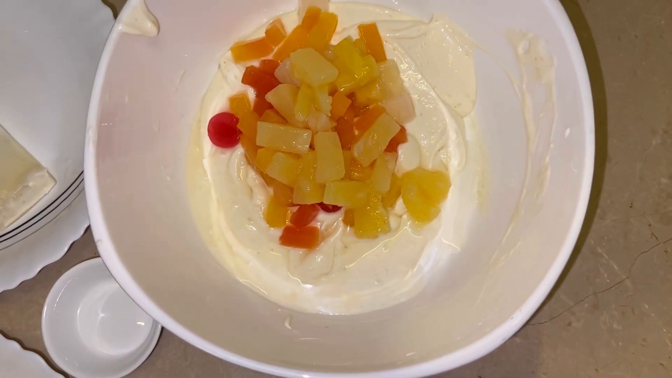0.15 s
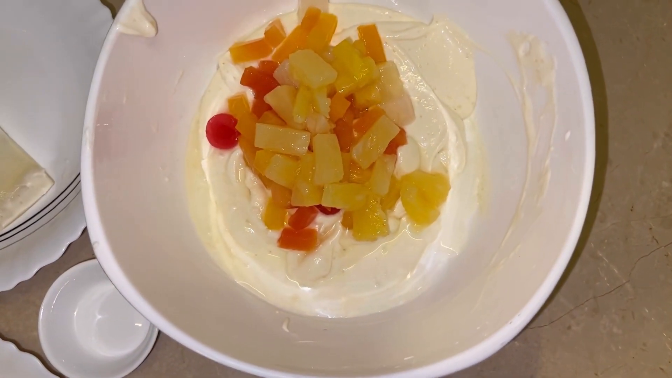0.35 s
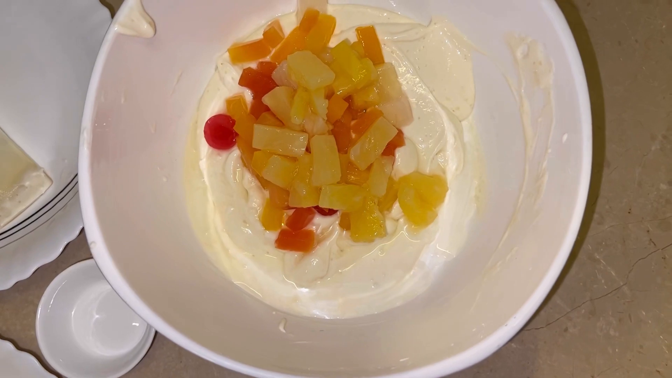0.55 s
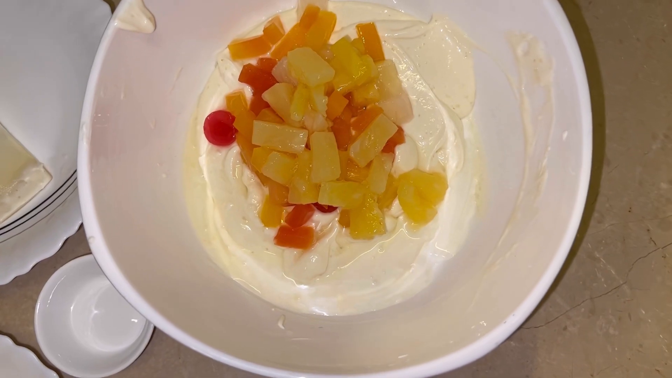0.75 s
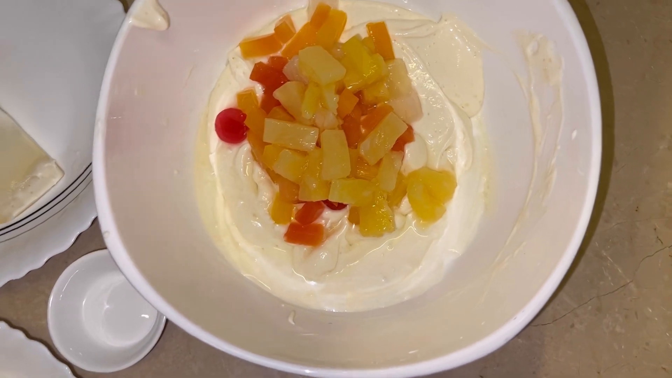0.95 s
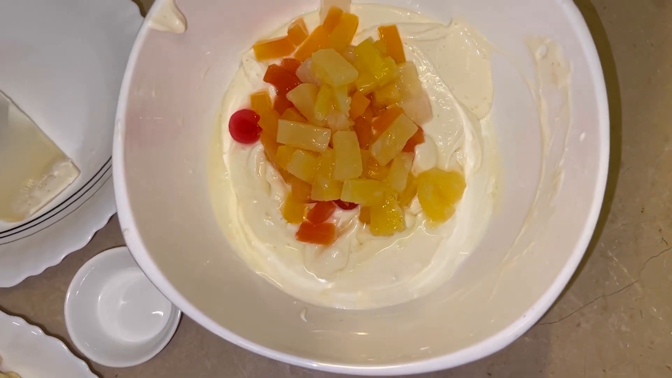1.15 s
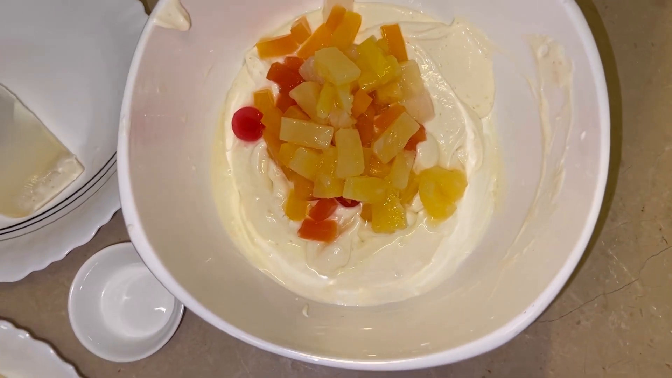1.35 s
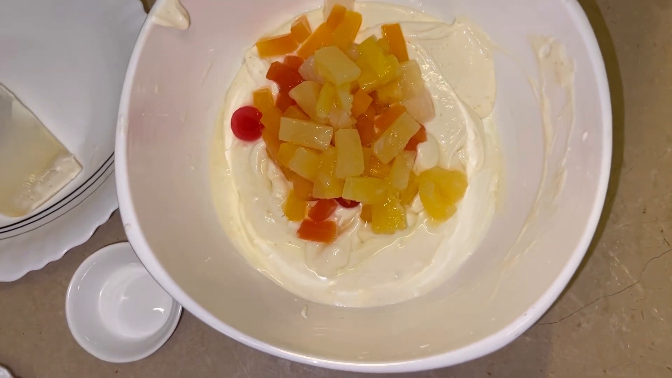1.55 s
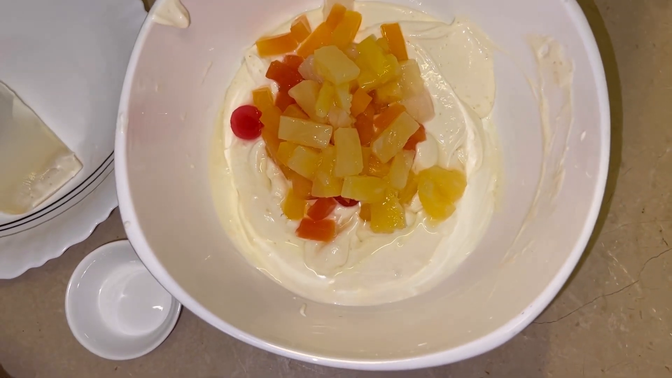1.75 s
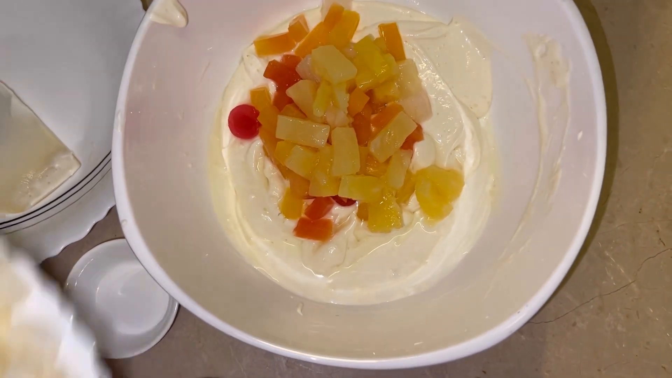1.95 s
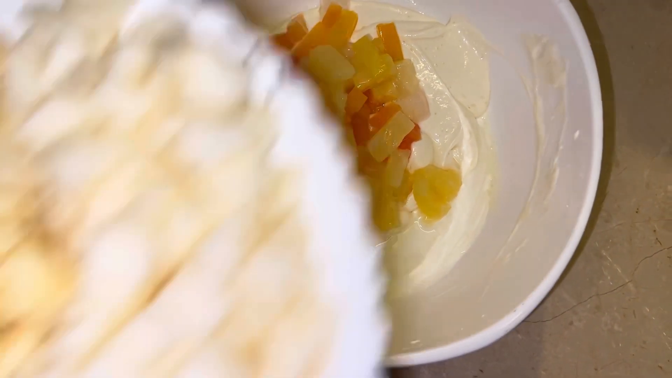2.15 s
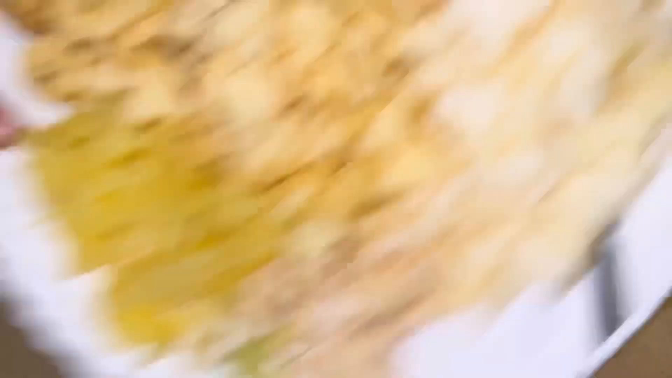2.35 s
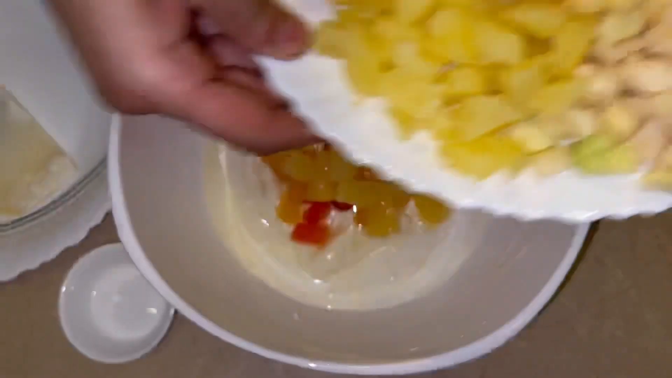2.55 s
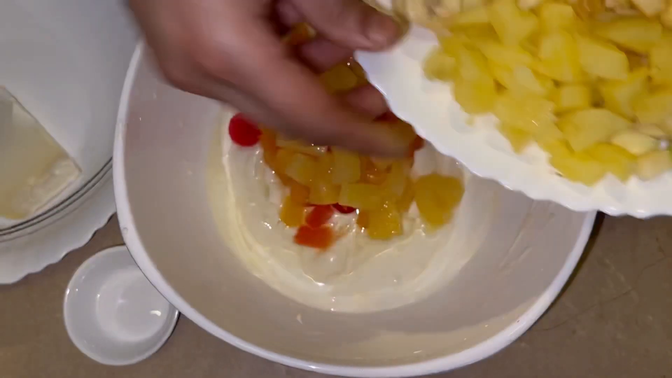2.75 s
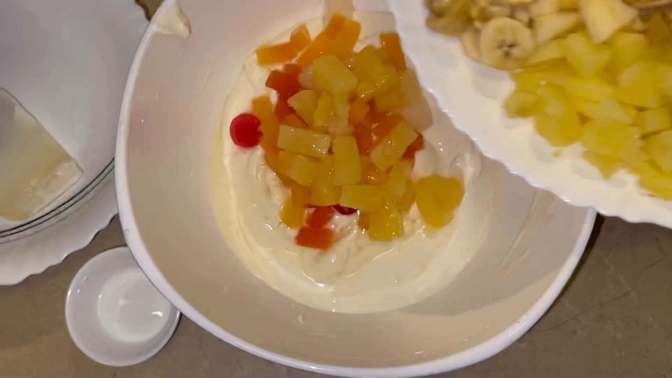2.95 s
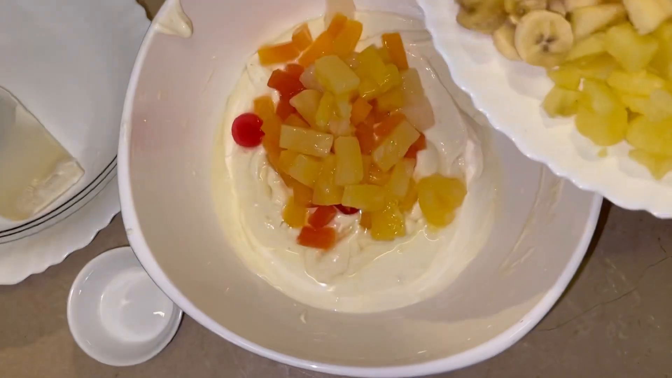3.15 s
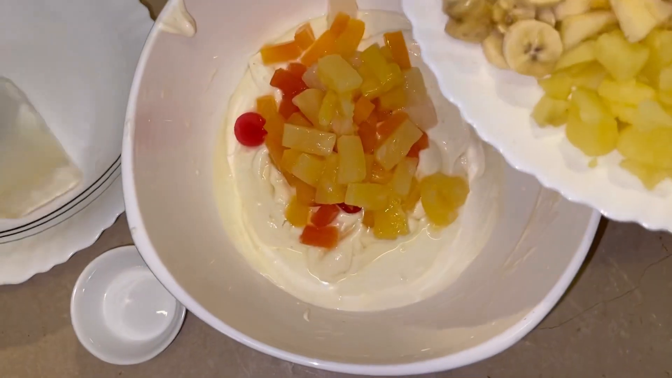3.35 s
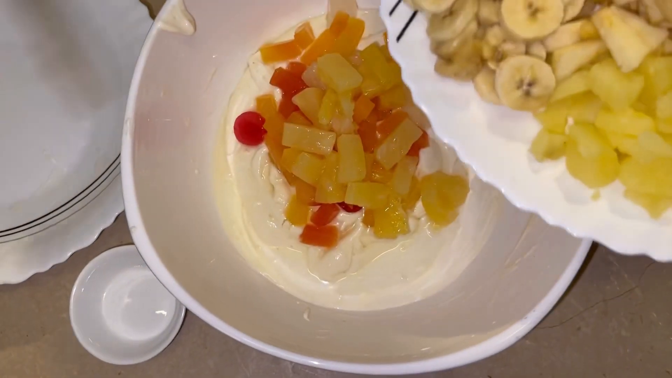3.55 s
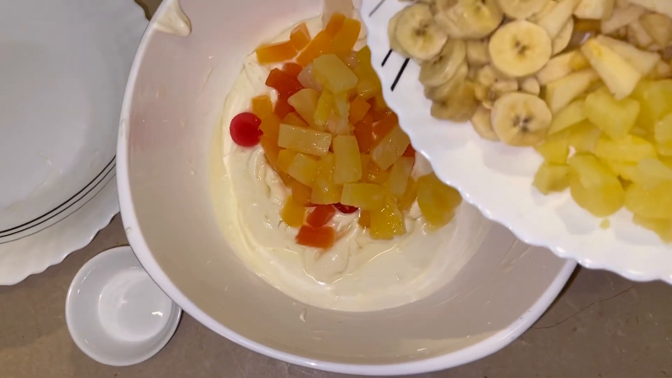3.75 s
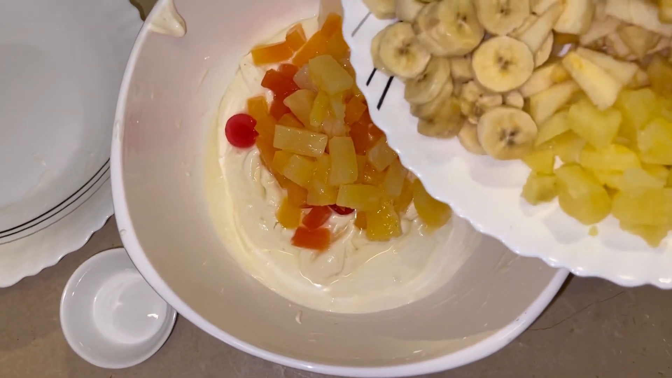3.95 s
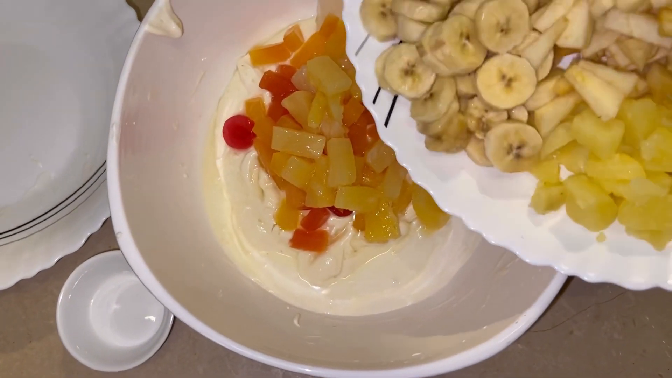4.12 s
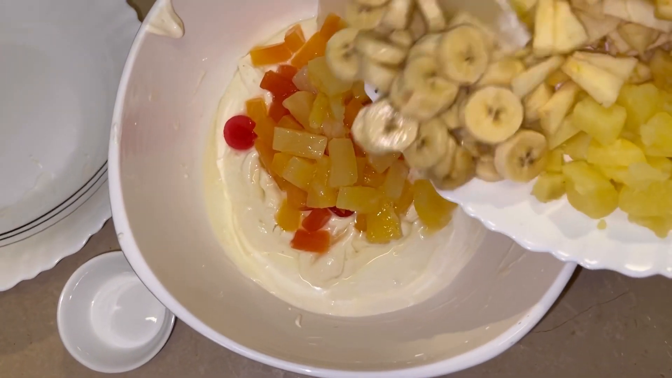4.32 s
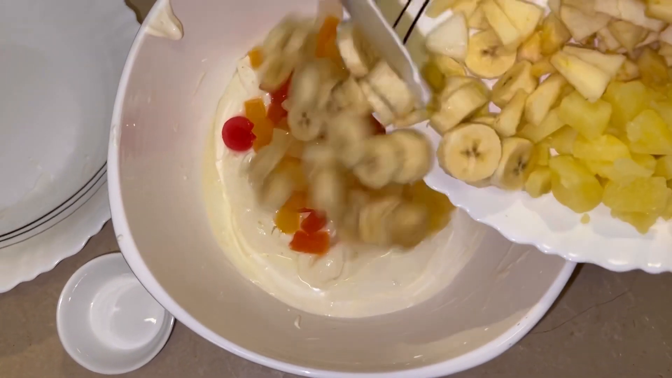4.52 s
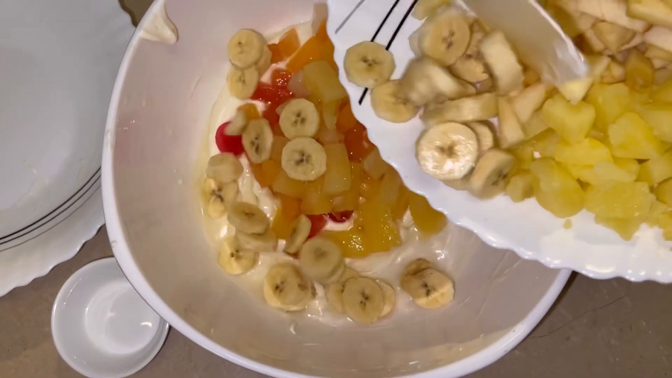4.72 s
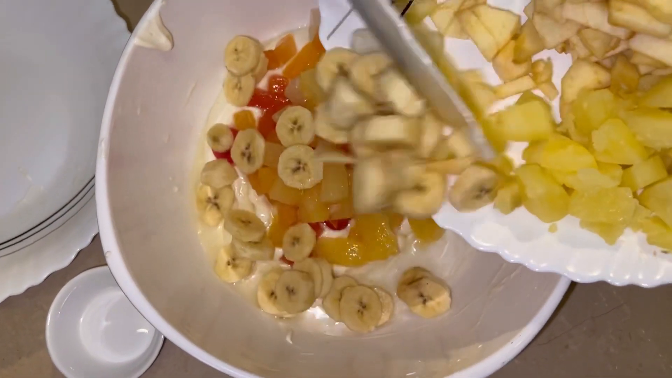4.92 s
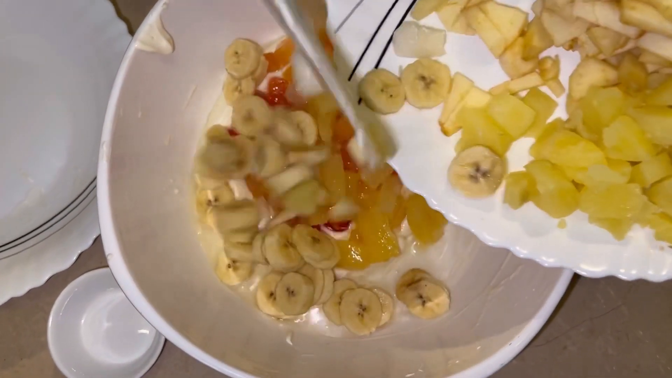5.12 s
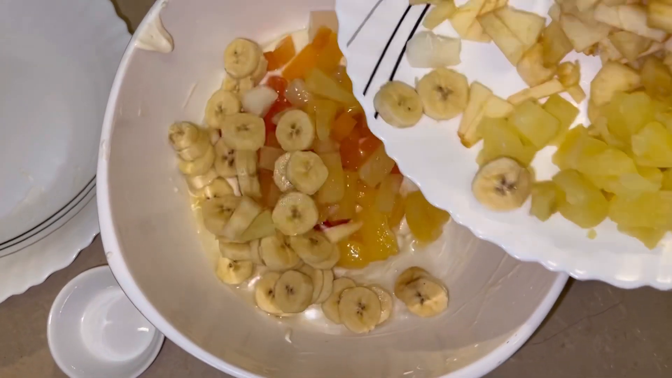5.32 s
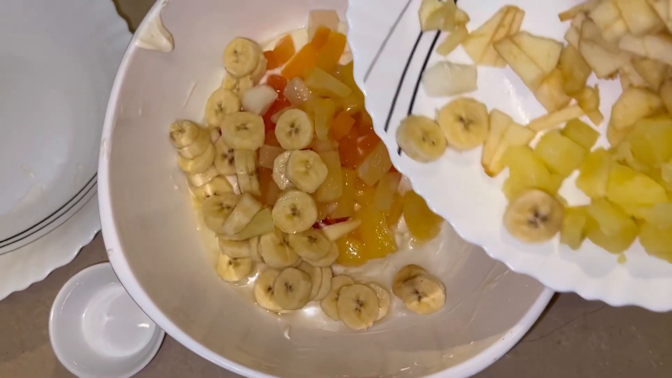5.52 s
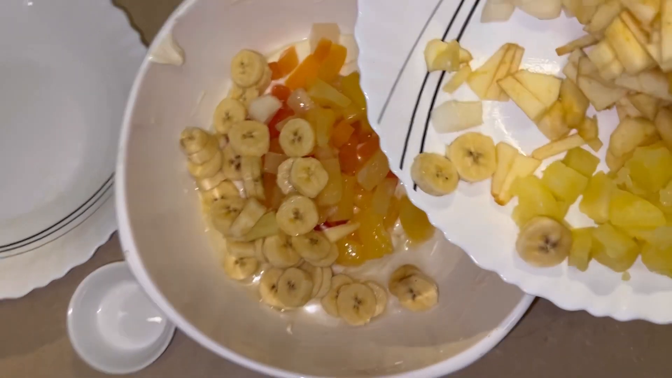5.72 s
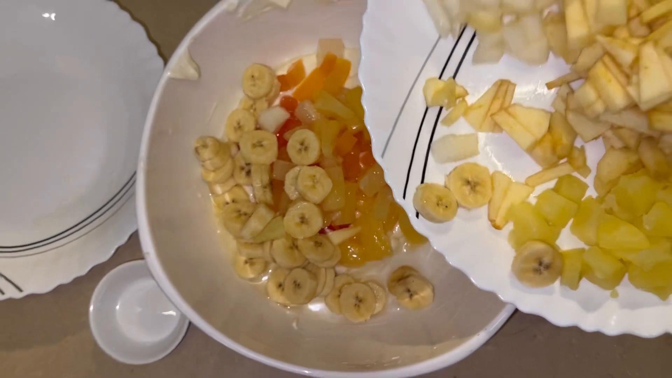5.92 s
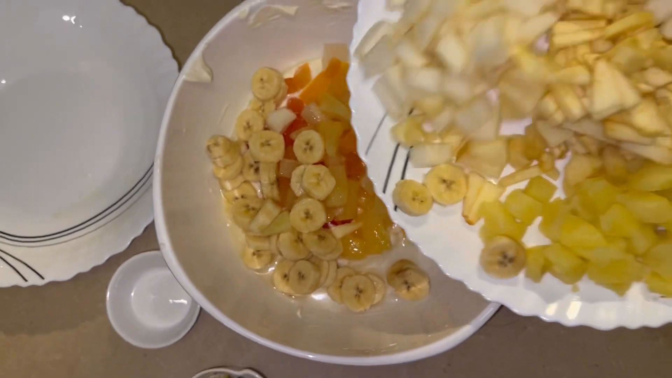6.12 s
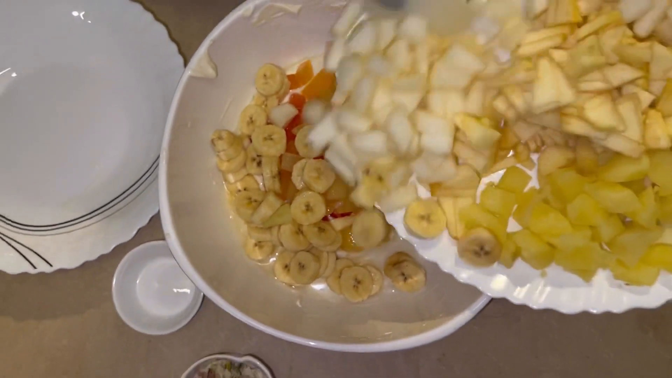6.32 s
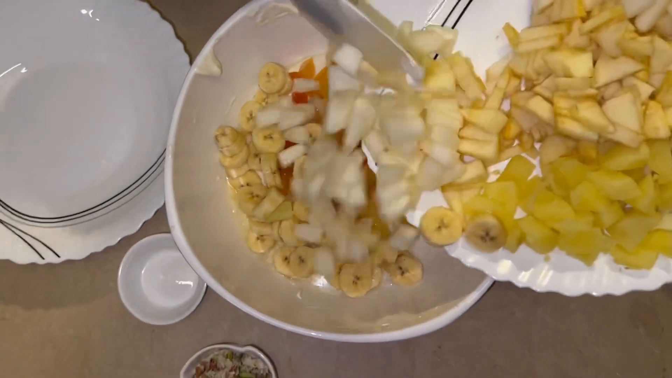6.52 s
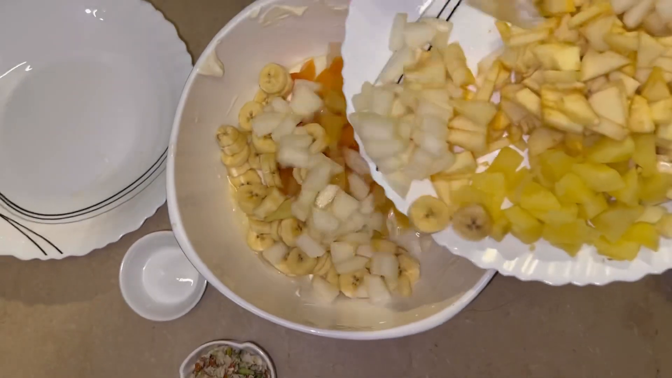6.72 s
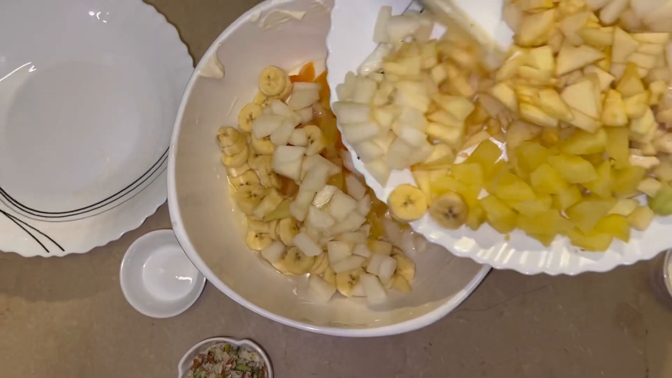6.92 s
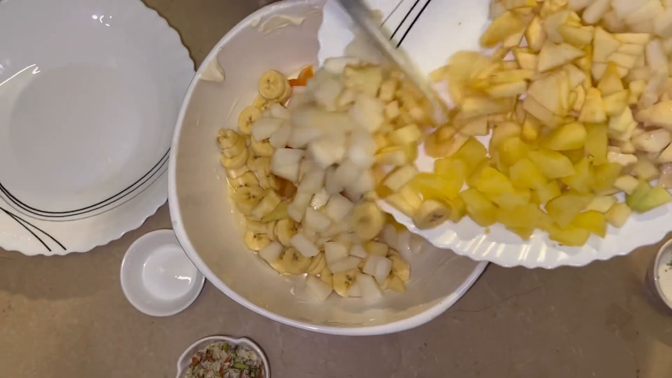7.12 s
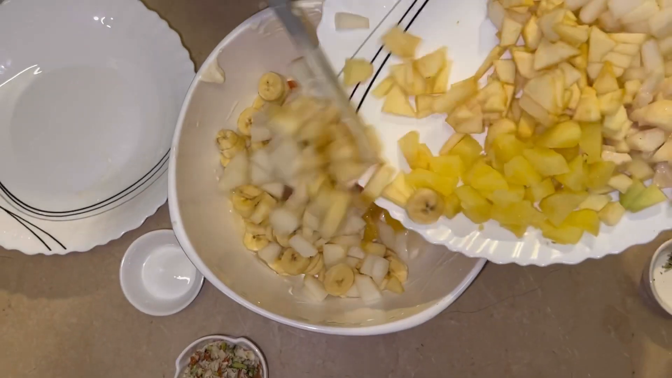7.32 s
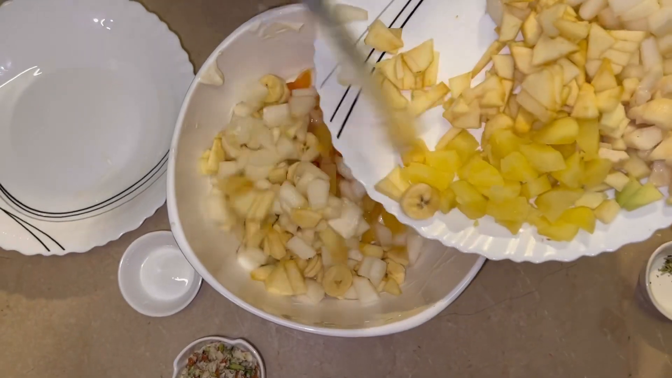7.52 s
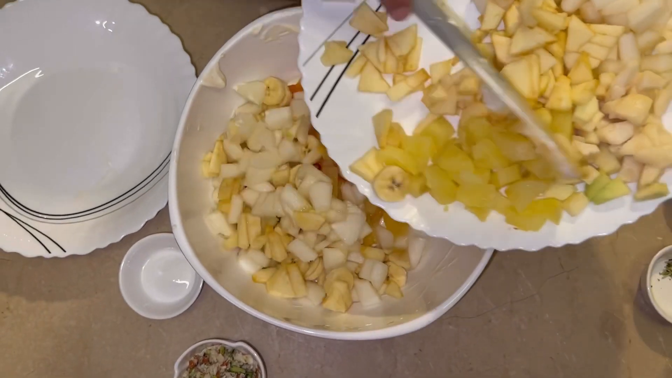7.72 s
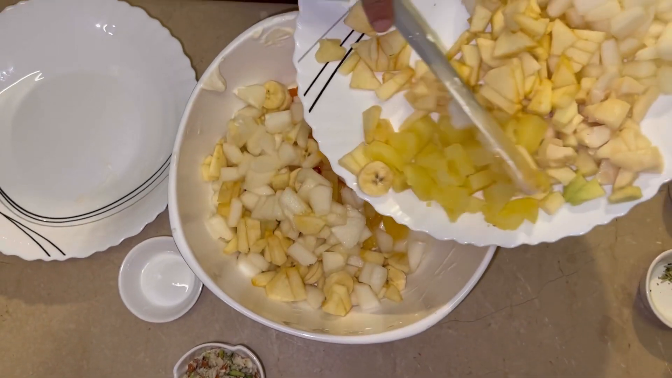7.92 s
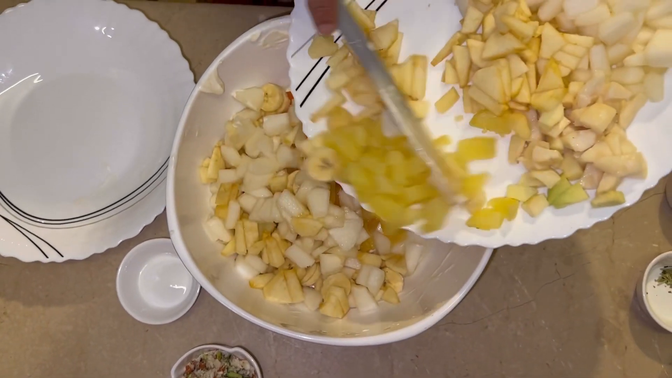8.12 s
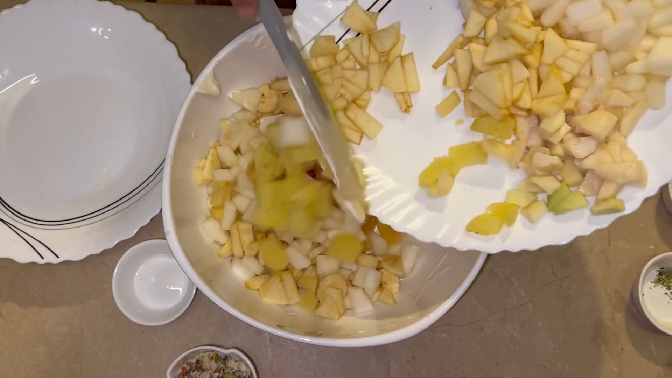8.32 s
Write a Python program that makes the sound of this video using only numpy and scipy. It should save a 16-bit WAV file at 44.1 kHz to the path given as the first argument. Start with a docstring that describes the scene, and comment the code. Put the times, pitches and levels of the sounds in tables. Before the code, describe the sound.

Close above a plastic bowl in a small kitchen, two china clinks sound a little way off, then a few dull knocks as a loaded plate is lifted. The plate strikes the bowl rim with a very loud, overloaded crack and quick bounces. A moderate knock follows near five seconds and a sharper double one after six, among barely audible wet fruit squelches, over a soft steady rush and low rumble.

```python
"""Chopped fruit tipped from a china plate

Dishes clink on a kitchen counter, then a loaded plate knocks dully as it is gripped and lifted.
It lands hard on a plastic bowl's rim, bounces and knocks again; a knife sweeps wet fruit into the bowl.
Blows are short pulses with noise bodies and decaying sine modes; squelches are filtered crackles.
The small room adds a brief diffuse tail; coloured noise makes a steady rush and a low rumble."""
import sys
import numpy as np
from scipy import signal
from scipy.fft import rfft, irfft
from scipy.io import wavfile

SR = 44100
rng = np.random.default_rng(int(sys.argv[2]) if len(sys.argv) > 2 else 0)


def unload_wav(signal):
    """Save mono or channel-first audio to the path in sys.argv[1] as 16-bit WAV at rate SR, clipped to [-1, 1]."""
    wavfile.write(
        sys.argv[1],
        SR,
        np.round(np.clip(np.atleast_2d(signal).T, -1, 1) * 32767).astype(np.int16),
    )


N = 373527
AGE = np.arange(SR) / SR  # s since a blow

# contact spectrum of clinking dishes and knife blade: f/Hz, level/dB
CLINK_COLOUR = [(100, -20), (400, -10), (660, -6), (850, -7), (1250, -1), (1650, 3), (2200, -4), (3800, -2),
                (5500, -6.5), (6800, -9.5), (10000, -19), (11500, -35), (13500, -39.5), (16000, -64.5)]


def from_db(db):
    """Decibels to amplitude gain."""
    return 10 ** (np.asarray(db) / 20)


def unit_energy(x):
    """Scale so that the squares sum to one."""
    return x / np.sqrt(np.sum(x ** 2))


def at_hz(points, hz):
    """Interpolate a table on a log-frequency axis."""
    known_hz, values = np.transpose(points)
    return np.interp(np.log(np.maximum(hz, 1)), np.log(known_hz), values)


def add(track, start_s, sound):
    """Mix a sound into the track from start_s."""
    start = round(start_s * SR)
    track[start:start + len(sound)] += sound[:N - start]


def dying(t60_s):
    """Exponential envelope that falls 60 dB in t60_s."""
    return from_db(-60 * AGE / t60_s)


def contact(colour, tilt_db_per_octave, bass_cut_hz):
    """Causal pulse of peak 1: harder contact tilts it to the treble, a glancing one loses bass."""
    hz = np.fft.rfftfreq(SR, 1 / SR)
    octaves = np.log2(np.maximum(hz / 1000, 1))  # tilt acts above 1 kHz
    level_db = at_hz(colour, hz) + tilt_db_per_octave * octaves
    cepstrum = irfft(np.log(from_db(level_db)))
    pulse = irfft(np.exp(rfft(2 * cepstrum[:SR // 2], SR)))  # minimum phase: energy comes at once
    high_pass = signal.butter(2, max(bass_cut_hz, 20), "high", fs=SR, output="sos")
    pulse = signal.sosfilt(high_pass, pulse)
    return pulse / np.abs(pulse).max()


def thock(colour, tilt_db_per_octave, body_db, body_t60_s, bass_cut_hz=60, build_s=0.0017,
          echo_s=0.001169, echo_db=-6.5):
    """Contact pulse, its echo off the dish's nearest wall, and a noise crowd of damped body modes."""
    pulse = contact(colour, tilt_db_per_octave, bass_cut_hz)
    echo = from_db(echo_db) * np.interp(AGE - echo_s, AGE, pulse, left=0)
    envelope = dying(body_t60_s) * (1 - dying(build_s))
    crowd = unit_energy(rng.standard_normal(SR) * envelope)
    body = from_db(body_db) * signal.fftconvolve(pulse, crowd)[:SR]
    return pulse + echo + body


def ring(modes, tilt_db_per_octave=0, spread_db=0.23):
    """Decaying sines of random sign and slightly random strength; positive tilt favours high modes."""
    hz, db, t60_s = np.transpose(modes)
    level_db = db + tilt_db_per_octave * np.log2(hz / np.median(hz))
    level_db = level_db + rng.normal(0, spread_db, len(modes))
    strength = from_db(level_db) * rng.choice([-1, 1], len(modes))
    return sum(g * np.sin(2 * np.pi * f * AGE) * dying(t) for g, f, t in zip(strength, hz, t60_s))


def kitchen(sound, room_db, build_s=0.025):
    """Add a diffuse room tail that builds up and then dies band by band."""
    # room decay: f/Hz, t60/s
    kitchen_t60 = [(100, 1), (400, 0.71), (900, 0.81), (2000, 0.67), (5000, 0.41), (9000, 0.39),
                   (15000, 0.48)]
    hz = np.fft.rfftfreq(SR, 1 / SR)
    white = rfft(rng.standard_normal(SR))
    centres_hz, t60s = np.transpose(kitchen_t60)
    tail = np.zeros(SR)
    for share, t60_s in zip(np.eye(len(centres_hz)), t60s):  # overlapping bands that sum to white
        band = irfft(white * at_hz(np.c_[centres_hz, share], hz))
        tail += band * dying(t60_s)
    tail = unit_energy(tail * (1 - dying(build_s)))
    return sound + from_db(room_db) * signal.fftconvolve(sound, tail)[:SR]


def bowl_blows():
    """Each blow is a short thock, the china's ring, and a mix of rim, thud and room modes."""
    # plate knocks on rim, and fruit thudding into the bowl at 6.4425 s:
    # t/s, level/dB, tilt/(dB/octave), bass cut/Hz, level of bowl modes/dB
    blows = [(2.8358, 3.5, 2.5, 40, -6.5), (2.8537, -7.5, -4, 330, -21), (2.8626, -4, 2, 250, -23),
             (2.9031, -15.5, -2, 400, -7), (4.9510, -11.5, -0.5, 120, -31), (6.3968, -8.5, 0.5, 383, -20),
             (6.4425, -24.5, -10, 200, -34), (7.989, -28.5, -4.5, 150, -34)]
    # contact spectrum: f/Hz, level/dB
    bowl_colour = [(50, -16), (170, -13), (420, -3), (620, 0), (830, 1), (1200, -3.5), (1600, -8),
                   (2600, -9.5), (4300, -16.5), (6200, -26), (7600, -36), (8900, -30), (10800, -48),
                   (16000, -76.5)]
    # china modes: f/Hz, level/dB, t60/s
    plate_modes = [(550, -5.5, 0.201), (810, -7.5, 0.31), (1216, -6, 0.27), (1360, -9.5, 0.31),
                   (2292, -6.5, 0.47), (2321, -7, 0.55), (2308, 2.5, 0.11), (2730, -15.5, .14),
                   (3506, -11, 0.25), (3566, -3.5, 0.1), (4110, -19.5, 0.13), (4060, -17.5, 0.101),
                   (4935, -8, 0.163), (4982, -3, 0.054), (5020, -27.5, .35), (6830, -17, 0.054),
                   (8790, -31, .08)]
    # short rim modes, low bowl and counter thud, long room modes: f/Hz, level/dB, t60/s
    bowl_and_room_modes = [(75, -34, 0.22), (168, -25, 0.1), (237, -28, 0.068), (332, -23.5, 0.087),
                           (461, -21, 0.22), (821, -17.5, 0.31), (947, -24, 0.22), (1067, -21, 0.26),
                           (1411, -24.5, 0.4), (1727, -11.5, 0.063), (1825, -0.5, 0.024),
                           (1892, -1.5, 0.017), (1990, -5, .06), (3035, -16.5, 0.087), (3200, -16, 0.088),
                           (3580, -30, 0.21), (3950, -9, 0.022), (4920, -31.5, 0.27), (4970, -18, .06),
                           (5000, -34.5, 0.18)]
    press_from_db, press_damping = -8, 0.4  # harder blows press the plate: dB ring lost per dB above
    ring_tilt_share = 0.405  # part of the blow's tilt that reaches the china
    body_db, plate_ring_db, room_db = -0.5, -22.5, -9.5
    out = np.zeros(N)
    for start_s, db, tilt, bass_cut_hz, modes_db in blows:
        blow = thock(bowl_colour, tilt, body_db, body_t60_s=0.047, bass_cut_hz=bass_cut_hz)
        muted_db = press_damping * max(db - press_from_db, 0)
        china = from_db(plate_ring_db - muted_db) * ring(plate_modes, ring_tilt_share * tilt)
        bowl_and_room = from_db(modes_db) * ring(bowl_and_room_modes)
        # the modes get a weaker room tail than the thock
        sound = kitchen(blow, room_db) + kitchen(china + bowl_and_room, room_db=-14.0)
        add(out, start_s, from_db(db) * sound)
    return out


def smacks():
    """Faint squelches at random times in each knife sweep: rows of t/s, level/dB, f/Hz."""
    # knife pushing fruit across the plate: start/s, end/s
    sweeps = [(4.5, 4.7), (6.1, 6.35), (7.1, 7.35), (8.05, 8.3)]
    smacks_per_s, level_db, level_spread_db = 11, -55, 1.5
    pitch_hz, pitch_spread_octaves = 5550, 0.32
    rows = []
    for start_s, end_s in sweeps:
        for _ in range(round((end_s - start_s) * smacks_per_s)):
            s = rng.uniform(start_s, end_s)
            db = rng.normal(level_db, level_spread_db)
            hz = pitch_hz * 2 ** rng.normal(0, pitch_spread_octaves)
            rows.append((s, db, hz))
    return rows


def fruit(pops_per_s=900, half_band=1.23):
    """Each squelch is a short band-passed crackle of juice films bursting."""
    # clearest squelches of wet fruit and cream: t/s, level/dB, f/Hz
    squelches = [(0.62, -52, 9000), (4.60, -54, 8500), (6.0133, -51, 7530), (6.7901, -50.5, 8700),
                 (7.4365, -49.5, 5500)]
    decay_s = 0.018  # to 1/e
    out = np.zeros(N)
    for start_s, db, hz in squelches + smacks():
        pops = (rng.random(SR) < pops_per_s / SR) * rng.standard_normal(SR) * np.exp(-AGE / decay_s)
        pops[0] = 1
        edges_hz = np.clip([hz / half_band, hz * half_band], 100, 0.45 * SR)
        band_pass = signal.butter(2, edges_hz, "band", fs=SR, output="sos")
        crackle = signal.sosfilt(band_pass, pops + 1e-18)  # offset avoids denormals
        crackle = crackle / np.abs(crackle).max()
        add(out, start_s, from_db(db) * kitchen(crackle, room_db=-10.0))
    return out


def knife():
    """A grazed steel blade rings thin and high."""
    # light blade touches: t/s, level/dB
    blade_ticks = [(2.7193, -54.5), (3.1316, -41)]
    # blade modes: f/Hz, level/dB, t60/s
    blade_modes = [(3570, -6.5, .3), (4790, -2, 0.318), (5938, -8, 0.28), (6430, -3.5, 0.115),
                   (7280, -9.5, .35), (7580, -7, 0.19), (8554, -11.5, 0.26), (9383, -14.5, .3),
                   (10370, -9.5, .2), (11550, -15, .15)]
    out = np.zeros(N)
    for start_s, db in blade_ticks:
        graze = thock(CLINK_COLOUR, 3.0, body_db=10.5, body_t60_s=0.045, bass_cut_hz=4500)
        tick = graze + from_db(-18.0) * ring(blade_modes)
        add(out, start_s, from_db(db) * kitchen(tick, room_db=-6.5))
    return out


def lifting():
    """Held in the hand, the loaded plate knocks without ringing modes."""
    # plate gripped and lifted: t/s, level/dB
    lift_knocks = [(1.2058, -21.5), (1.2208, -30.5), (1.2642, -24.5), (1.3883, -22)]
    # contact spectrum: f/Hz, level/dB
    lift_colour = [(100, -12), (450, -13), (620, -1), (880, -2), (1150, -3), (1500, -11), (1900, -10.5),
                   (3000, -10.5), (3700, -15.5), (4500, -15.5), (6300, -30), (9000, -41), (16000, -68)]
    tilt_db_per_octave, room_db = -0.7, -4
    out = np.zeros(N)
    for start_s, db in lift_knocks:
        knock = thock(lift_colour, tilt_db_per_octave, body_db=2.5, body_t60_s=0.034)
        add(out, start_s, from_db(db) * kitchen(knock, room_db))
    return out


def dishes():
    """China clinks a little way off: a pulse with a strong body, then ringing modes."""
    # dishes on the counter: t/s, level/dB, tilt/(dB/octave), ring/dB
    clinks = [(0.1210, -22, -1.5, -8), (0.2755, -22, 1.7, -18.5)]
    # dish modes: f/Hz, level/dB, t60/s
    dish_modes = [(659, -5, 0.078), (1049, -12.5, 0.66), (1253, -6, 0.15), (1436, -5.5, 0.21),
                  (1606, -9.5, 0.32), (1637, -3.5, 0.25), (1705, -10, 0.29), (1718, -4, 0.13),
                  (1790, -5, 0.044), (2260, -13, 0.21), (3090, -14.5, 0.34), (3940, -18, .3),
                  (4950, -14, 0.21), (4975, 2.5, 0.079), (5340, -7, 0.034), (5610, -3, 0.054)]
    out = np.zeros(N)
    for start_s, db, tilt, ring_db in clinks:
        blow = thock(CLINK_COLOUR, tilt, body_db=10.5, body_t60_s=0.045, build_s=0.0014)
        song = from_db(ring_db) * ring(dish_modes, tilt)
        clink = kitchen(blow, room_db=-4) + kitchen(song, room_db=-7.0)
        add(out, start_s, from_db(db) * clink)
    return out


def noise(spectrum):
    """Steady Gaussian noise of a given colour, rms 1."""
    gain = from_db(at_hz(spectrum, np.fft.rfftfreq(N, 1 / SR)))
    return np.sqrt(N) * unit_energy(irfft(rfft(rng.standard_normal(N)) * gain, N))


def background():
    """An even rush of air over a low rumble that swells once as the plate swings over the bowl."""
    # air rush spectrum: f/Hz, level/dB
    rush_colour = [(90, -16), (125, -3.5), (180, -4), (450, -7), (640, -5), (1150, -11), (1850, -16.5),
                   (4200, -29.5), (5400, -35.5), (6400, -40.5), (8900, -39), (11300, -49.5), (13500, -56),
                   (16000, -58)]
    # low drone and rumble spectrum: f/Hz, level/dB
    rumble_colour = [(10, 4.5), (22, 9.5), (33, -0.5), (42, -1.5), (52, -1.5), (65, -4), (88, -13.5),
                     (112, 1), (135, -6.5), (180, -51)]
    rush_db, rumble_db = -49, -53
    swing_at_s, swing_width_s, swing_db = 2.9, 0.36, 3.5
    swing = np.exp(-((np.arange(N) / SR - swing_at_s) / swing_width_s) ** 2)
    rush = from_db(rush_db) * noise(rush_colour)
    rumble = from_db(rumble_db + swing_db * swing) * noise(rumble_colour)
    return rush + rumble


def scene():
    """Sum of all sources, as heard from just above the bowl."""
    return (bowl_blows() + fruit() + knife() + lifting() + dishes() + background())[None]


def record(dry):
    """Microphone overload clips at full scale; a steep low-pass cuts the top."""
    cutoff_hz = 15900
    low_pass = signal.ellip(10, 0.1, 80, cutoff_hz, fs=SR, output="sos")
    return signal.sosfilt(low_pass, np.clip(dry, -1, 1))


dry = scene()
out = record(dry)
unload_wav(out)
```